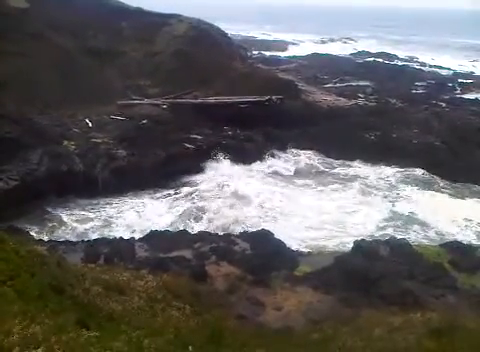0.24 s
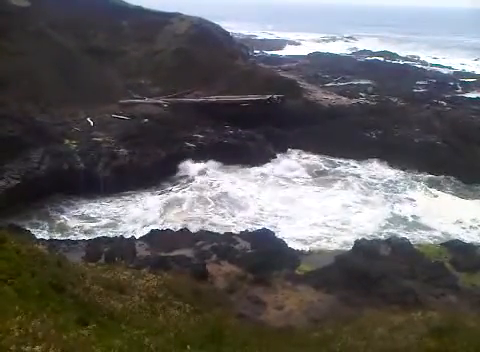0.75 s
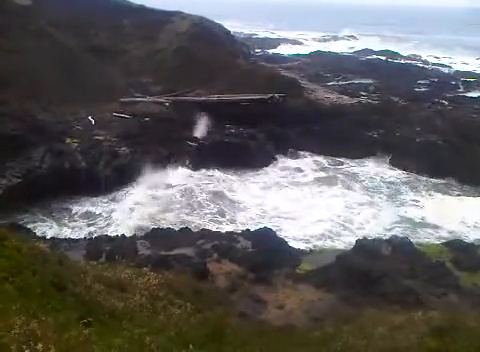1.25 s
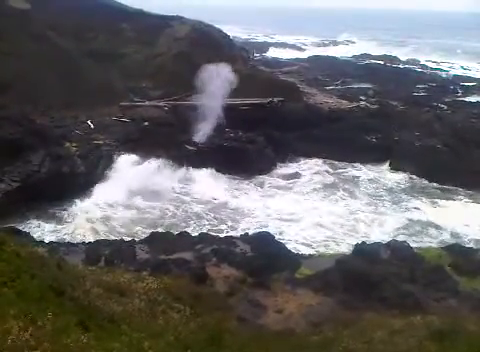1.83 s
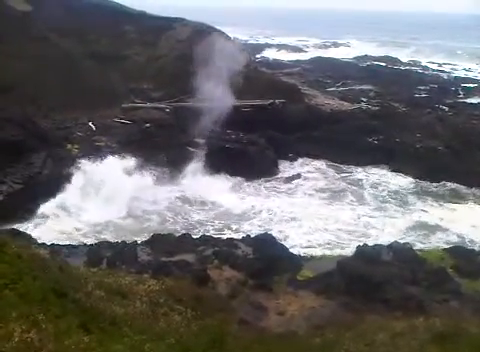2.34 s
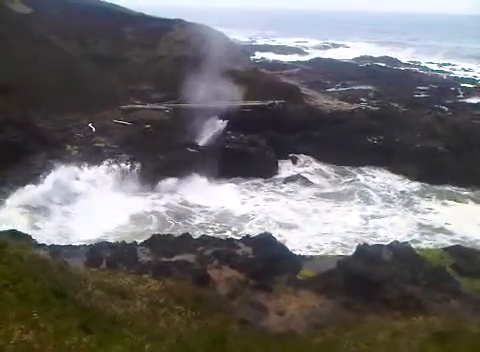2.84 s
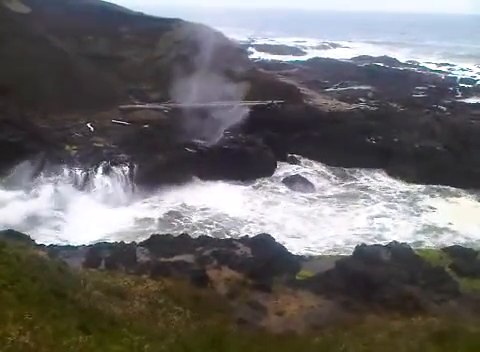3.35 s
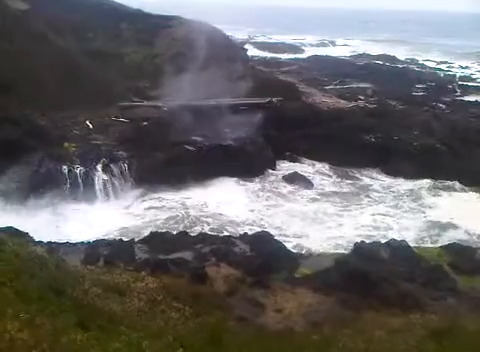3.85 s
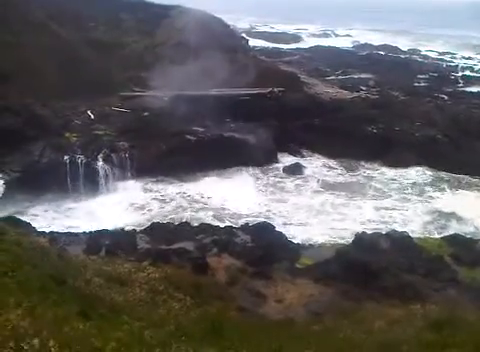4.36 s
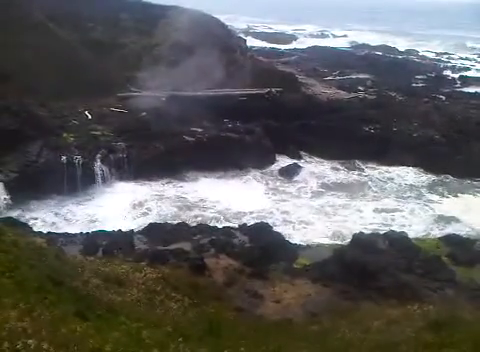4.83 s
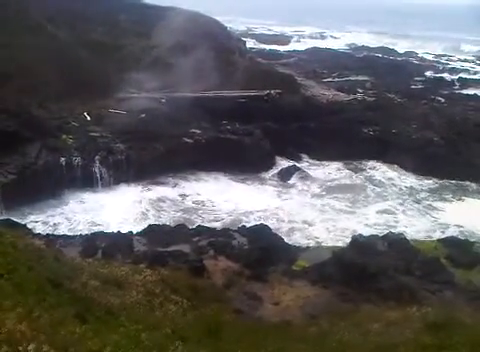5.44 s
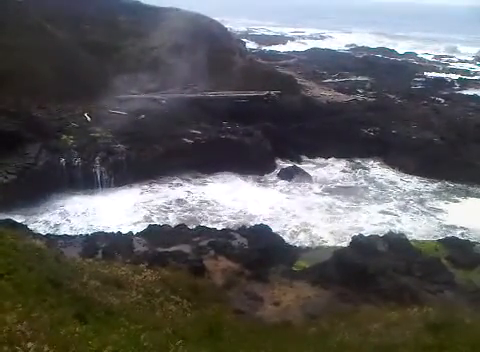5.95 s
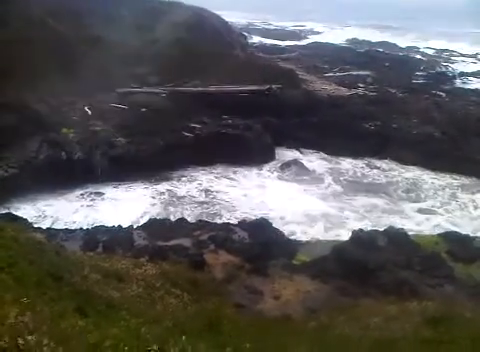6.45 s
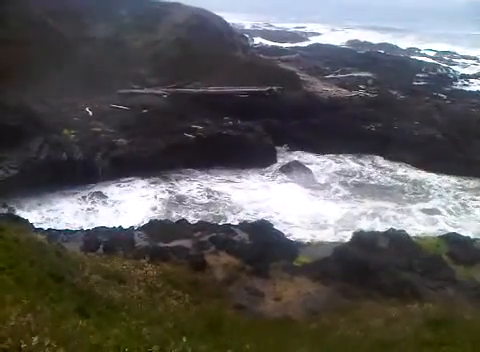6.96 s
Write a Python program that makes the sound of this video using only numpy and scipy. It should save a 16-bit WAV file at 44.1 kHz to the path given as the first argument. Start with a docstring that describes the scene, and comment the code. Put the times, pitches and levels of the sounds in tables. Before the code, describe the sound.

From a cliff top, the sea churns steadily below under a low wind rumble. A blowhole lets out a brief rush of air and mist, and the wave swells to a foamy roar on the rocks, trailing off in a hiss of falling spray. Close, irregular wind buffets crowd the microphone through the second half. Near the end come a faint slosh and one small dry tick nearby.

```python
"""Surf in a rocky inlet, heard from the cliff above, with wind fluttering on the microphone throughout.
The water sloshes, then near 1.8 s a wave drives air and mist out of a blowhole. It meets the rocks,
bursts at 3 s in a roar of foam, and its spray rains back and runs off. From 3.5 to 6 s sputtering
gusts strike the microphone thick and fast, each a burst of eddies. A last slosh follows far below,
and one dry tick close by."""
import sys
import numpy as np
from scipy import signal
from scipy.fft import rfft, irfft, next_fast_len
from scipy.io import wavfile
from scipy.ndimage import uniform_filter1d, map_coordinates

SR = 44100
rng = np.random.default_rng(int(sys.argv[2]) if len(sys.argv) > 2 else 0)


def put_to_file(sound):
    """Save the sound as 16-bit audio at rate SR, in the file named by the first command-line argument."""
    columns = np.atleast_2d(sound).T  # one column per channel
    safe = np.clip(columns, -1, 1)
    whole_steps = np.round(safe * 32767)
    wavfile.write(sys.argv[1], SR, whole_steps.astype(np.int16))


N = 317079
TIME = np.arange(N) / SR

# Water down in the inlet: a slosh, the wave meeting the rocks, bursting, raining back, running off,
# a last slosh. Each row: crest time, rise, hold and fall in seconds, spray level and foam level in dB.
SURGES = [(0.42, 0.85, 0.4, 0.27, -65.5, -56.5), (2.108, 0.22, 0.027, 0.28, -65, -56),
          (3.062, 0.9, 0.25, 0.32, -54.5, -48), (3.948, 0.52, 0.046, 1, -55, -49),
          (5.25, 0.4, 0.17, 1.1, -66.5, -65.5), (6.497, 0.3, 0.16, 0.71, -75.5, -66)]
# Tone of the foam, the spray and the blowhole from the cliff top, and of the tick close by.
# Each row: frequency in Hz, relative spectral level in dB.
FOAM_SPECTRUM = [(20, -2), (55, 9), (110, 7.5), (280, 5), (440, 0), (620, -1), (800, -1), (1050, 3),
                 (1400, -2.5), (1650, -4), (2200, -9.5), (3200, -9.5), (6000, -38)]
SPRAY_SPECTRUM = [(500, -9), (1500, 4), (2300, 3.5), (2900, -0.5), (3200, -2.5), (3600, 3.5), (4400, 4),
                  (5050, 1.5), (5700, 2), (6700, -1), (7300, -5), (7800, -18), (8300, -33.5), (8900, -48)]
JET_SPECTRUM = [(25, 1), (65, 6.5), (240, 11), (420, 2.5), (700, -1.5), (1050, 4.5), (1550, -5.5),
                (2200, -8), (3200, -15.5), (4200, -12), (7000, -42.5), (8000, -42)]
TICK_SPECTRUM = [(500, -18), (1100, -6), (1700, -2), (3000, -5), (4700, 2), (6300, -3.5), (7300, -17),
                 (8500, -31)]
# Gusts striking the microphone. Each row: start and end in seconds, relative level in dB,
# eddy pitch at mid-gust in Hz, fall of pitch in octaves, growth of level in dB.
GUSTS = [(0.109, 0.149, -41, 92, 0, -1), (0.726, 0.753, -34.5, 72, 0, -6.5),
         (0.928, 0.972, -46, 139, -0.52, -9), (1.273, 1.288, -42, 115, 0, -6),
         (1.334, 1.361, -35.5, 146, 0.44, 0), (1.407, 1.454, -35.5, 173, 0.19, 3),
         (1.553, 1.589, -34, 161, -0.78, -7), (2.754, 2.789, -28, 216, 0.53, 6),
         (2.789, 2.84, -29, 148, 0.28, -1.5), (3.501, 3.532, -26, 278.4, 0.9, 4.5),
         (3.908, 3.933, -27.5, 285.7, 1, 3), (3.94, 4.015, -24, 295.9, 0.25, 2),
         (4.188, 4.31, -28.5, 230, -0.19, 7), (4.314, 4.379, -32, 218, .3, 3),
         (4.384, 4.451, -30.5, 190, 0.17, -1), (4.459, 4.555, -29.5, 125, 0.35, 5),
         (4.564, 4.698, -30, 192.2, 0.8, -1.5), (4.705, 4.76, -27.5, 179, 0.2, 5),
         (4.823, 4.834, -26, 183, -0.26, -3), (4.854, 4.865, -28, 295, -0.1, -4),
         (4.964, 4.989, -29, 214, 0.19, 7), (4.999, 5.018, -29.5, 220, 0.63, 7),
         (5.03, 5.063, -26.5, 155, -0.68, 5), (5.089, 5.109, -29.5, 240, 0.018, 4),
         (5.803, 5.814, -31, 315, 0.22, 7), (5.819, 5.83, -29.5, 231, 0.16, -4),
         (5.833, 5.854, -28, 254, -.3, -2), (5.868, 5.881, -25.5, 253, -0.51, 0),
         (6.059, 6.073, -29, 261, 0.042, -2), (6.428, 6.455, -38, 185, -0.75, -9)]
# Single strong eddies on the microphone. Each row: time in seconds, relative level in dB, pitch in Hz.
LONE_EDDIES = [(3.036, -21.5, 283), (3.039, -32, 260), (3.224, -32.5, 350), (3.365, -27, 238),
               (3.433, -28, 377), (3.48, -29, 300), (3.488, -28, 249), (3.512, -24, 354), (3.883, -32, 332),
               (3.907, -22, 450), (4.062, -29, 250), (4.113, -26.5, 300), (4.221, -17, 290),
               (4.272, -13, 250), (4.312, -26, 450), (4.33, -24.5, 454), (4.394, -23.5, 400),
               (4.426, -20, 180), (4.444, -22, 160), (4.475, -26, 380), (4.489, -21.5, 404),
               (4.507, -16.5, 318), (4.552, -24, 170), (4.664, -32, 300), (4.676, -23.5, 334),
               (4.75, -12, 150), (4.858, -22.5, 416), (4.945, -23, 230), (4.982, -18.5, 250),
               (5.017, -24, 420), (5.062, -20.5, 386), (5.098, -22, 320), (5.554, -30, 270),
               (5.672, -29.5, 169), (5.731, -25.5, 226), (5.753, -33, 380), (5.786, -29, 230),
               (5.823, -15.5, 228), (5.843, -26, 430), (5.852, -17.5, 330), (5.879, -21, 427),
               (5.888, -27, 260), (5.901, -29, 300), (5.959, -25, 340), (5.985, -17, 380),
               (5.996, -18.5, 390), (6.002, -23.5, 430), (6.014, -17, 340), (6.065, -20.5, 360),
               (6.269, -31, 320), (6.45, -31, 238), (6.598, -29, 247), (6.764, -31.5, 212),
               (6.88, -34, 200), (7.097, -33, 240)]
# Light wind on the cliff top. Each row: time in seconds, relative level in dB.
BREEZE_LEVELS = [(0.0, -51), (1.22, -57.5), (1.52, -48), (1.78, -37.5), (2.0, -53.5), (2.42, -50.5),
                 (2.92, -43.5), (3.88, -46.5), (4.27, -46.5), (4.39, -35), (4.66, -32), (4.79, -42),
                 (5.27, -44.5), (5.92, -43.5), (6.3, -42.5), (7.19, -47)]
# Peaks and dips of the housing around the microphone. Each row: centre and half width in Hz, gain in dB.
HOUSING_BANDS = [(1650, 48, 1), (3320, 100, -2), (3510, 130, 2), (5250, 150, -1), (5650, 220, 1)]


def foam(steady_db=-54, linger=1.37):
    """Foam and bubbles roar down in the inlet, rising and falling more slowly than the spray."""
    froth = churn(patchy_db=1.0)
    froth += amp(-15) * bubbles(count=5000, low_hz=393, high_hz=2480, cycles=3.6, spread_db=-1.5)
    *_, surge_dbs = np.transpose(SURGES)
    level = surging(steady_db, surge_dbs, linger) * amp(0.13 * wobble(3.1))
    return level * coloured(froth, FOAM_SPECTRUM)


def spray(steady_db=-65):
    """Drops and run-off hiss on the rocks below with each surge."""
    drops = churn(patchy_db=1.5)
    drops += amp(-10.5) * bubbles(count=7000, low_hz=1930, high_hz=6950, cycles=0.68, spread_db=2.0)
    *_, surge_dbs, _ = np.transpose(SURGES)
    level = surging(steady_db, surge_dbs, linger=1) * amp(0.12 * wobble(1.3))
    return level * coloured(drops, SPRAY_SPECTRUM)


def blowhole(level_db=-45, mist_db=-17, flutter_db=2.0):
    """The wave squeezes a jet of air and hissing mist out of a crack in the rock."""
    jet = coloured(churn(patchy_db=1.5), JET_SPECTRUM)
    mist = amp(mist_db) * coloured(rng.standard_normal(N), SPRAY_SPECTRUM)
    spout = swell(crest=1.78, rise=0.5, hold=0.05, fall=0.19)
    return spout * amp(level_db + flutter_db * wobble(23)) * (jet + mist)


def wind(limit=0.17, cut_hz=100, burst_cut_hz=58, hump_hz=230, hump_width_hz=130):
    """The microphone rounds off the hardest pushes, cuts the deep bass and adds a hollow hump above it."""
    def microphone(hz):
        hump = 1j * hz * hump_width_hz / (hump_hz ** 2 - hz ** 2 + 1j * hz * hump_width_hz)
        return bass_cut(hz, cut_hz, damping=1.1) * (1 + amp(-12) * hump)

    bursts = filtered(gusts() + lone_eddies(), lambda hz: bass_cut(hz, burst_cut_hz, np.sqrt(2)))
    pressure = limit * np.tanh((breeze() + bursts + sputter()) / limit)
    return amp(-1.17) * filtered(pressure, microphone)


def gusts(spread_db=1.3, pitch_spread=0.26, gentle_below_db=-28):
    """The flow breaks away and sheds bursts of eddies: denser in fast gusts, wavier in gentle ones."""
    out = np.zeros(N)
    for start, end, db, hz, fall_octaves, growth_db in GUSTS:
        duration = end - start
        count = int(duration * hz * 1.4) + 2
        size, pitch = rng.standard_normal((2, count))
        progress = (np.arange(count) + rng.random(count)) / count
        eddy_hz = hz * np.exp(pitch_spread * pitch) * 2 ** (fall_octaves * (0.5 - progress))
        sizes = amp(spread_db * size + growth_db * progress)
        swing = 2.2 + 0.17 * max(gentle_below_db - db, 0)
        burst = eddies(start + duration * progress, sizes, eddy_hz, swing)
        burst_rms = np.sqrt(np.sum(burst ** 2) / (duration * SR))
        out += amp(db) * burst / burst_rms
    return out


def lone_eddies(gain_db=1):
    """Lone eddies pop on the microphone in and between the gusts."""
    times, db, hz = np.transpose(LONE_EDDIES)
    return eddies(times, amp(db + gain_db), hz, swing=2.5)


def breeze(count=2100, pitch_hz=120, pitch_spread=0.56, spread_db=3, flutter_db=2.0, gain_db=1.03):
    """A steady train of weak, slow eddies rumbles on the microphone."""
    size, pitch = rng.standard_normal((2, count))
    times = scattered_times(count)
    train = eddies(times, amp(spread_db * size), pitch_hz * np.exp(pitch_spread * pitch), swing=1.88)
    level_db = np.interp(TIME, *np.transpose(BREEZE_LEVELS))
    return amp(level_db + gain_db + flutter_db * wobble(13)) * unit(train)


def sputter(count=45, over_breeze_db=6, spread_db=1.0, pitch_hz=235, pitch_spread=0.19):
    """Stray eddies brush the microphone at random, their strength following the breeze."""
    times = scattered_times(count)
    size, pitch = rng.standard_normal((2, count))
    db = np.interp(times, *np.transpose(BREEZE_LEVELS)) + over_breeze_db - spread_db * size
    return eddies(times, amp(db), pitch_hz * np.exp(pitch_spread * pitch), swing=1.9)


def tick(at_s=6.5757, level_db=-27):
    """One small, dry tick close to the microphone."""
    snap = coloured(signal.unit_impulse(N, int(at_s * SR)), TICK_SPECTRUM)
    return amp(level_db) * snap / snap.max()


def churn(patchy_db):
    """Noise in which patches of pitch swell and fade, as separate splashes do."""
    spectrogram = signal.stft(rng.standard_normal(N), nperseg=512)[2]
    patches = uniform_filter1d(rng.standard_normal(spectrogram.shape), size=6, axis=0)  # across pitch
    patches = uniform_filter1d(patches, size=16, axis=1)  # along time
    splashes = signal.istft(spectrogram * amp(patchy_db * unit(patches)), nperseg=512)[1]
    return unit(splashes[:N])


def bubbles(count, low_hz, high_hz, cycles, spread_db):
    """A cloud of bubbles or drops, each a sine that dies by 1/e in the given number of cycles."""
    when, pitch, size = rng.random((count, 3)).T[:, :, None]
    age = np.arange(SR // 100)
    turns = low_hz * (high_hz / low_hz) ** pitch * age / SR
    strength = amp(-spread_db * np.log(np.maximum(size, 1 / count)))
    rings = strength * np.sin(2 * np.pi * turns) * np.exp(-turns / cycles)
    samples = (when * N).astype(int) + age
    return unit(np.bincount(samples.ravel(), rings.ravel(), N)[:N])


def eddies(times, sizes, hz, swing):
    """Each eddy crossing the microphone is a smooth pressure pulse near hz; swing makes it wavier."""
    samples = (times[:, None] * SR).astype(int) + np.arange(-SR // 80, SR // 80)
    phase = 2 * np.pi * hz[:, None] * (samples / SR - times[:, None]) / swing
    lean = np.exp(2j * np.pi * rng.random((len(times), 1)))  # push, pull or one after the other
    shapes = (lean / (1 - 1j * phase) ** (swing + 1)).real
    pulses = sizes[:, None] * shapes * np.hanning(samples.shape[1])
    inside = (samples >= 0) & (samples < N)
    return np.bincount(samples[inside], pulses[inside], N)


def surging(steady_db, surge_dbs, linger):
    """Gain of the steady churn and the surges, added in power; linger stretches each rise and fall."""
    power = amp(steady_db) ** 2
    for (crest, rise, hold, fall, *_), db in zip(SURGES, surge_dbs):
        power += (amp(db) * swell(crest, rise * linger, hold, fall * linger)) ** 2
    return np.sqrt(power)


def swell(crest, rise, hold, fall):
    """Gain that grows to its crest, holds and dies away; rise and fall are the seconds for 10 dB."""
    before = np.maximum(crest - TIME, 0)
    after = np.maximum(TIME - crest - hold, 0)
    return amp(-10 * (before / rise + after / fall))


def scattered_times(count):
    """One random time in seconds in each of count equal slots."""
    return (np.arange(count) + rng.random(count)) * N / SR / count


def wobble(rate):
    """A smooth random curve, rate knots a second."""
    return map_coordinates(rng.standard_normal(int(N * rate / SR) + 4), [TIME * rate])


def coloured(x, spectrum):
    """x shaped by (Hz, dB) points, at rms 1."""
    points_hz, db = np.transpose(spectrum)
    return unit(filtered(x, lambda hz: amp(np.interp(np.log(hz + 1), np.log(points_hz), db))))


def filtered(x, response):
    """x passed through a frequency response."""
    length = next_fast_len(N + SR // 4)
    hz = np.fft.rfftfreq(length, 1 / SR)
    return irfft(rfft(x, length) * response(hz), length)[:N]


def bass_cut(hz, edge_hz, damping):
    """Response of a second-order high-pass."""
    return hz ** 2 / (hz ** 2 - edge_hz ** 2 - 1j * damping * hz * edge_hz)


def amp(db):
    """Decibels to gain."""
    return 10 ** (np.asarray(db) / 20)


def unit(x):
    """Scale to rms 1."""
    return x / np.sqrt(np.mean(x ** 2) + 1e-20)


def scene():
    """From the cliff top, in mono: the sea far below, the wind and the tick right at the microphone."""
    return (foam() + spray() + blowhole() + wind() + tick())[None]


def record(dry):
    """The housing around the microphone colours the treble, and nothing passes above the band limit."""
    top_hz, taper_hz = 8870, 400

    def response(hz):
        housing_db = sum(db * np.exp(-((hz - centre) / width) ** 2) for centre, width, db in HOUSING_BANDS)
        return amp(housing_db) * np.clip((top_hz - hz) / taper_hz, 0, 1)

    return filtered(dry[0], response)[None]


dry = scene()
out = record(dry)
put_to_file(out)
```